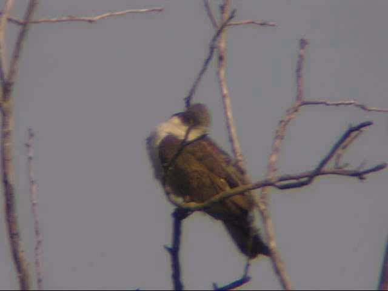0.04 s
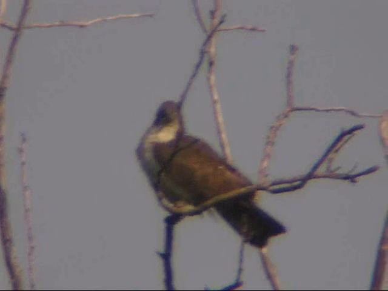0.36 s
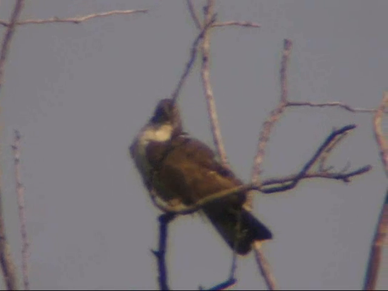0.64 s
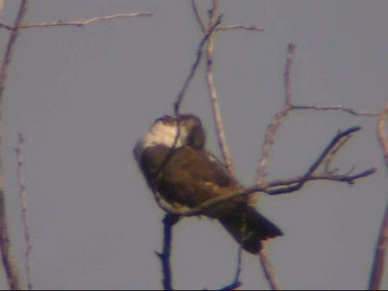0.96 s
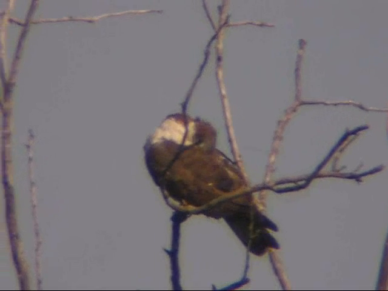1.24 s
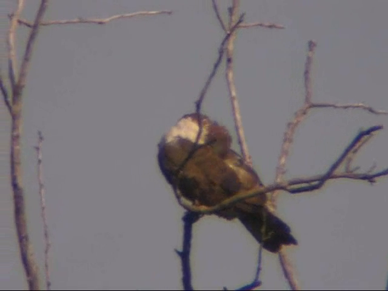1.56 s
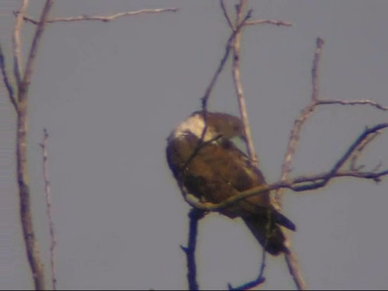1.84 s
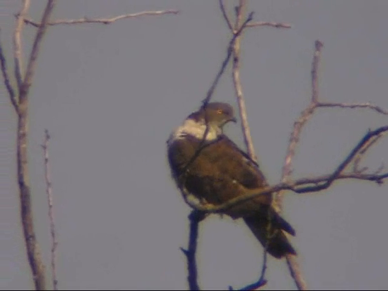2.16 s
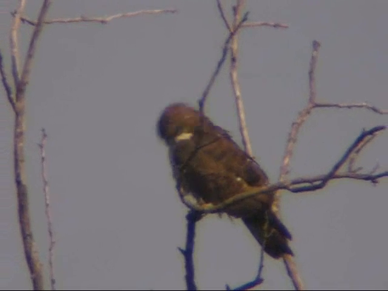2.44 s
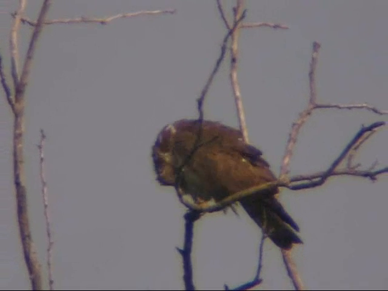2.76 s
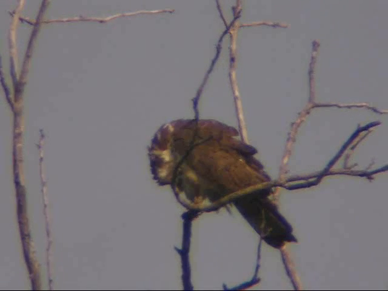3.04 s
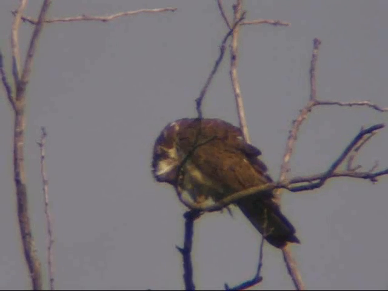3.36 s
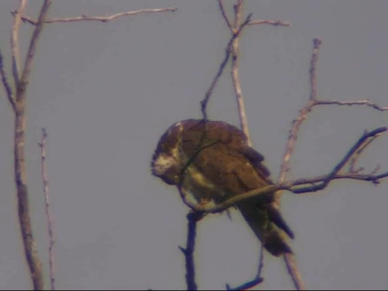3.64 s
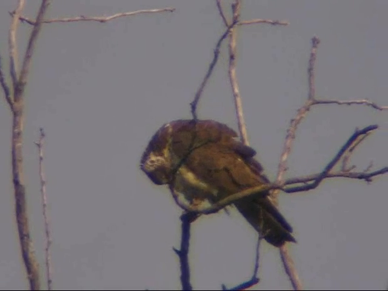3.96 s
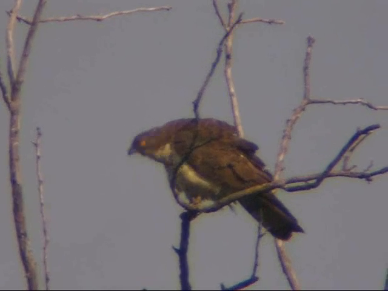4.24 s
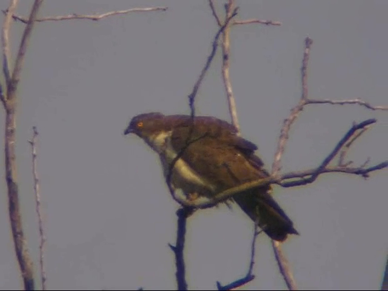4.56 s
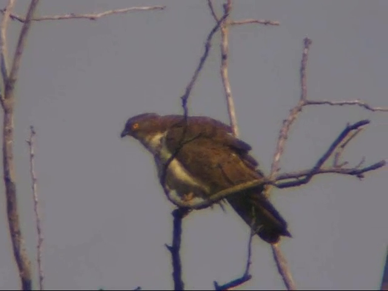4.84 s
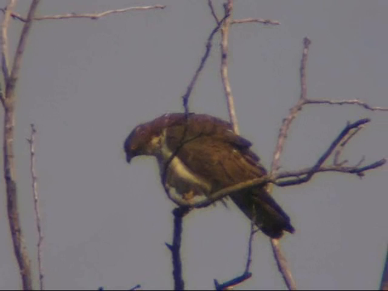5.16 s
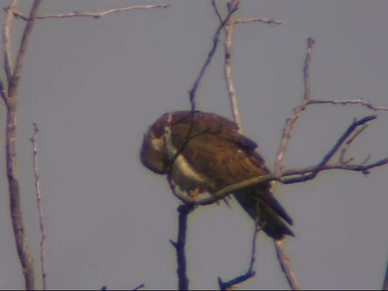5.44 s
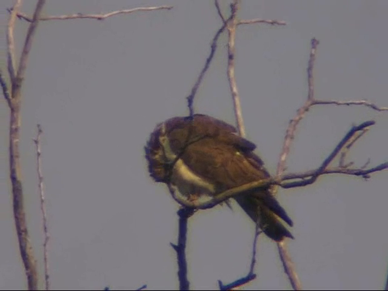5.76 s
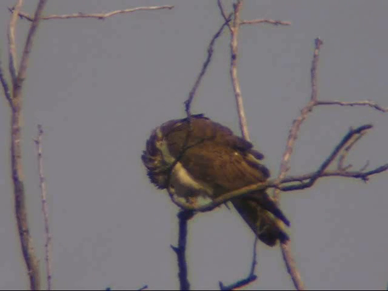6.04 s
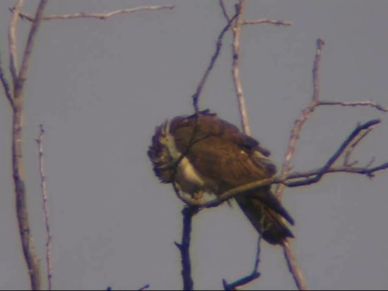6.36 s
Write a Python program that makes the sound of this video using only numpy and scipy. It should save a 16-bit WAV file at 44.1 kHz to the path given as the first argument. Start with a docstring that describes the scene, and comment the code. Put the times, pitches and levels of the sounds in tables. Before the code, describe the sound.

A small songbird warbles in quick, sweeping chirps outdoors, while wind rumbles on the microphone and one sharp click sounds close by.

```python
"""A small songbird warbles in the trees, each quick note a pure tone swept in frequency.
Other birds add ticks, buzzy trills and a thin whistle; branches and trunks scatter the song.
Turbulent gusts buffet the microphone and a few dry clicks ring close by, over a distant rush
and a late, low hum. The camera whines faintly and holds coarse samples, whose spectral
images mirror every chirp into the treble."""
import sys
import numpy as np
from scipy import signal
from scipy.fft import rfft, irfft, next_fast_len
from scipy.io import wavfile
from scipy.ndimage import uniform_filter1d, map_coordinates

SR = 44100
rng = np.random.default_rng(int(sys.argv[2]) if len(sys.argv) > 2 else 0)


def file_out(sig):
    """Save sig as 16-bit WAV at sys.argv[1]."""
    # one column per channel
    cols = np.atleast_2d(sig).T
    # limit, then scale
    lim = np.clip(cols, -1, 1)
    pcm = np.round(lim * 32767).astype(np.int16)
    wavfile.write(sys.argv[1], SR, pcm)


N = 281799
HOLD_SAMPLES = 4
NYQUIST_HZ = SR / HOLD_SAMPLES / 2  # half the camera's sampling rate
SLUR_START_HZ, WHISTLE_HZ = 4360, 4585
PUFF_EDDY_HZ = 86  # spectral corner of the large eddies in a puff
EDDY_BANK_HZ = np.geomspace(30, 960, num=11)  # corners that the long gust blends between

# Levels are relative: each source's function may add a gain of its own.
# spectrum of the distant rush: frequency_hz, density_db
RUSH_SPECTRUM = [(100, 8), (200, 6), (300, 3.5), (400, 2.5), (670, 7), (970, -1.5), (1400, -8),
                 (1900, -10.5), (3500, -11), (5200, -13)]
# slow drift of the rush: time_s, level_db
RUSH_LEVEL = [(.2, -43), (3.5, -44.5), (4.9, -42.5), (6.39, -44)]
# far hum: start_s, pitch_hz, final_level_db
FAR_HUM = (5.2, 308, -47.5)
# camera tones: pitch_hz, level_db
WHINE_TONES = [(1824, -58.5), (3606, -61), (3644, -67)]
# dry clicks: start_s, attack_level_db, cutoff_hz
DRY_CLICKS = [(0.2994, -39.5, 4500), (0.562, -38.5, 2440), (.572, -41, 4000), (1.3006, -10, 4730),
              (1.346, -36.5, 5000), (1.426, -32.5, 1330), (3.7437, -31, 1870)]
# modes that a click excites: frequency_hz, level_db, t60_s
CLICK_MODES = [(1222, -5, 0.028), (1500, -11.5, 0.034), (1890, 0, 0.012), (2093, 2.5, 0.018),
               (2430, -1, 0.021), (3170, -2, 0.016), (4230, -7, 0.0099)]
# light air on the microphone: frequency_hz, density_db
BREEZE_SPECTRUM = [(15, -9), (45, 0.5), (85, -1.5), (130, -16.5), (250, -20.5), (600, -67)]
# puffs of wind: start_s, length_s, level_db
WIND_PUFFS = [(0.139, 0.06, -22.5), (0.236, 0.028, -11), (0.284, 0.069, -20), (0.411, 0.054, -14),
              (.553, 0.05, -14.5), (0.635, .168, -16), (1.03, 0.11, -15), (3.349, 0.12, -22.5),
              (3.537, 0.043, -24), (3.806, 0.031, -23), (3.89, 0.091, -25.5), (4.198, .19, -16),
              (4.45, 0.19, -32.5)]
# wind speed of the long gust, relative to a puff: time_s, speed_ratio
GUST_SPEED = [(1.22, 0.22), (1.32, 0.87), (1.6, .92), (1.7, 1.16), (1.9, 1.42), (2.06, 2.34), (2.11, 0.29),
              (2.18, 3.48), (2.42, 2.76), (2.5, 1.93), (2.66, 4.13), (2.73, 7.65), (2.89, 7.8), (2.93, 3.8),
              (3.03, 4.8), (3.19, 3.13), (3.245, .9), (3.33, 0.4)]
# thin whistle: start_s, length_s, level_db, fade_db_per_s
THIN_WHISTLE = (1.44, .5, -45, 9)
# row of bird ticks: start_s, spacing_s, count, first_level_db, last_level_db
TICK_ROW = (.262, .1245, 9, -48, -38.5)
# falling pitch of a tick: start_hz, middle_hz, end_hz
TICK_GLIDE = (6150, 5900, 5050)
# trills: start_s, rate_per_s, count, first_top_hz, last_top_hz, fall_hz, level_db, peak_fraction
BIRD_TRILLS = [(1.511, 60.5, 9, 3550, 3150, 700, -34.5, .4), (2.273, 53, 2, 3150, 3050, 380, -33, .5),
               (2.628, 32, 6, 3020, 2830, 70, -31, .2), (3.757, 115, 3, 3200, 3150, 450, -31, .5),
               (6.298, 61, 4, 3550, 3150, 700, -28, .8)]
# down-slurs, the song's refrain: start_s, length_s, landing_hz, level_db
SONG_SLURS = [(2.416, 0.0256, 3790, -34), (2.808, 0.061, 2967, -30.5), (2.995, 0.11, 2810, -36),
              (3.324, 0.12, 3215, -31.5), (3.521, 0.11, 3140, -29), (3.715, 0.1, 3140, -26),
              (3.926, .106, 3053, -26), (4.13, .12, 3100, -27), (4.922, 0.045, 3450, -37.5)]
# notes that slide onto a pitch and hold it: start_s, length_s, start_hz, held_hz, level_db
SONG_HELD_NOTES = [(0.133, 0.047, 2670, 2740, -48), (1.375, 0.05, 4670, 4310, -47),
                   (1.851, 0.034, 2570, 2824, -34), (2.174, 0.046, 2740, 3166, -32),
                   (2.599, 0.074, 3080, 2885, -37), (2.716, 0.027, 4100, 3800, -36.5),
                   (3.169, 0.093, 3160, 3105, -26.5), (3.383, 0.063, 3900, 3924, -37),
                   (3.906, 0.062, 2755, 2870, -28.5), (4.257, 0.053, 3180, 3148, -28),
                   (4.523, 0.07, 2490, 2610, -34), (4.729, 0.1, 2713, 3183, -27.5),
                   (4.977, 0.049, 3390, 2924, -27.5), (5.096, .033, 3970, 3640, -37.5),
                   (5.318, .096, 3340, 3013, -25)]
# nearly straight sweeps: start_s, length_s, start_hz, end_hz, level_db
SONG_SWEEPS = [(1.976, 0.036, 3610, 4070, -41.5), (2.148, 0.033, 2390, 2850, -38.5),
               (2.309, 0.042, 2900, 2410, -33.5), (2.454, .056, 3610, 3060, -30),
               (2.74, .024, 3820, 4300, -37.5), (3.241, 0.041, 3080, 2420, -31.5),
               (3.823, 0.021, 3070, 2850, -31), (4.008, 0.036, 4550, 3530, -35.5),
               (4.059, 0.046, 2300, 2070, -42.5), (4.211, 0.045, 4370, 3320, -32.5),
               (4.432, 0.063, 4370, 2850, -31.5), (4.68, 0.03, 2620, 2330, -41.5),
               (5.134, 0.056, 3890, 3600, -36), (5.443, 0.083, 2740, 2200, -42)]
# contour of each kind of note: glide_fraction, ease_exponent, peak_fraction, thinning_db_per_khz
SLUR_CONTOUR = (.8, 1.8, 0.77, 10)
HELD_CONTOUR = (0.49, 2.12, 0.46, 6.9)
SWEEP_CONTOUR = (0.93, 0.99, 0.45, 4.4)


def amp(db):
    """Amplitude ratio of a level in decibels."""
    return 10 ** (np.asarray(db) / 20)


def unit(x):
    """Normalisation to rms 1."""
    return x / np.sqrt(np.mean(x ** 2) + 1e-20)


def curve(points):
    """Linear interpolation of (time_s, value) points at every sample."""
    return np.interp(np.arange(N) / SR, *np.transpose(points))


def during(start, length, fade_s):
    """A raised-cosine gate, its flanks centred on the ends of a span."""
    t = np.arange(N) / SR - start
    return np.sin(np.pi / 2 * np.clip(.5 + np.minimum(t, length - t) / fade_s, 0, 1)) ** 2


def wobble(rate):
    """Random modulation: a spline through rate knots a second."""
    knots = rng.standard_normal(int(N * rate / SR) + 4)
    return map_coordinates(knots, [np.arange(N) * rate / SR])


def filtered(x, response):
    """Linear filtering: the spectrum is multiplied by a frequency response."""
    size = next_fast_len(N + SR // 2)
    return irfft(rfft(x, size) * response(np.fft.rfftfreq(size, 1 / SR)), size)[:N]


def noise(spectrum):
    """Coloured noise of rms 1, band-limited to the camera's Nyquist frequency."""
    points_hz, db = np.transpose(spectrum)
    colour = lambda hz: amp(np.interp(np.log(hz + 1), np.log(points_hz), db)) * (hz < NYQUIST_HZ)
    return unit(filtered(rng.standard_normal(N), colour))


def add(track, start_s, sound):
    """Superposition of a sound onto a track."""
    part = track[round(start_s * SR):][:len(sound)]
    part += sound[:len(part)]


def tone(hz):
    """A sinusoid whose phase is the integral of its frequency."""
    return np.sin(2 * np.pi * np.cumsum(hz) / SR)


def distant_rush(gain_db=4):
    """Broadband noise, strongest in the bass, under slow amplitude modulation."""
    return amp(curve(RUSH_LEVEL) + gain_db + 0.44 * wobble(4)) * noise(RUSH_SPECTRUM)


def far_hum(waver_hz=14):
    """A low tone with random frequency modulation grows linearly out of the rush."""
    start, hz, db = FAR_HUM
    swell = curve([(start, 0), (N / SR, 1)])
    return amp(db) * swell * unit(tone(hz + waver_hz * wobble(60)))


def camera_whine():
    """Faint sinusoids, each with slight frequency modulation."""
    return sum(amp(db) * unit(tone(hz + 2 * wobble(8))) for hz, db in WHINE_TONES)


def clicks(crack_t60=0.013, low_cut_hz=700):
    """Impulse response: a short crack of noise and the free decay of damped modes."""
    out, t = np.zeros(N), np.arange(SR // 10) / SR
    highpass = signal.butter(2, low_cut_hz, "high", fs=SR, output="sos")
    for start, db, cutoff_hz in DRY_CLICKS:
        ring = np.zeros(len(t))
        for hz, mode_db, t60 in CLICK_MODES:
            decay = amp(mode_db + rng.normal(0, 1) - 60 * t / t60)
            ring += decay * np.sin(2 * np.pi * (hz * t + rng.random()))
        crack = amp(-60 * t / crack_t60) * rng.standard_normal(len(t))
        lowpass = signal.butter(6, min(cutoff_hz, NYQUIST_HZ), fs=SR, output="sos")
        snap = signal.sosfilt(highpass, signal.sosfilt(lowpass, ring + crack))
        add(out, start, amp(db) * snap / np.std(snap[t < .003]))  # level of the first 3 ms
    return out


def eddies(white, corner_hz, steepness=7, tilt=0.28, fine_db=-24, fine_ratio=2.8):
    """Turbulent cascade: large eddies below a corner break up into weaker, smaller ones."""
    def band(hz, corner):
        return (hz > 15) * (hz + 1) ** -tilt / np.sqrt(1 + (hz / corner) ** steepness)
    cascade = lambda hz: band(hz, corner_hz) + amp(fine_db) * band(hz, fine_ratio * corner_hz)
    flow = unit(filtered(white, cascade))
    local_power = np.abs(uniform_filter1d(flow ** 2, size=2200))
    return flow / np.sqrt(local_power + 0.098)  # evens out the strength


def puffs(gain_db=1.0, fade_s=0.07):
    """Intermittent turbulence: short bursts of large, slow eddies."""
    strength = sum(amp(db + gain_db) * during(start, length, fade_s) for start, length, db in WIND_PUFFS)
    return strength * eddies(rng.standard_normal(N), PUFF_EDDY_HZ)


def long_gust(full_db=-12.5, knee_speed=1.12, growth=4, unsteadiness=0.15):
    """Eddy frequency scales with wind speed; amplitude follows a power law, then levels off."""
    speed = curve(GUST_SPEED)
    corner_hz = PUFF_EDDY_HZ * speed * np.exp(unsteadiness * wobble(70))
    bank_index = np.interp(np.log(corner_hz), np.log(EDDY_BANK_HZ), np.arange(len(EDDY_BANK_HZ)))
    white = rng.standard_normal(N)
    flow = np.zeros(N)
    for k, hz in enumerate(EDDY_BANK_HZ):
        weight = np.maximum(1 - np.abs(bank_index - k), 0)
        flow += weight * eddies(white, hz)
    return amp(full_db) * flow / np.sqrt(1 + (knee_speed / speed) ** (2 * growth))


def wind(breeze_db=-36, flutter_db=3.5, overload=0.5, muffle_hz=2200):
    """Saturation: gusts ride on a light breeze, and the strongest eddies overload the microphone."""
    gusts = (puffs() + long_gust()) * amp(flutter_db * wobble(80))
    pressure = gusts + amp(breeze_db) * noise(BREEZE_SPECTRUM)
    saturated = pressure / (1 + np.abs(pressure / overload) ** 6) ** (1 / 6)
    return filtered(saturated, lambda hz: 1 / np.sqrt(1 + (hz / muffle_hz) ** 10))


def trees(x, near_db=-14, near_t60=0.28, far_db=-14, far_t60=0.65, echo_s=0.12, echo_db=-20):
    """Scattering from near branches and far trunks, with one reflection from a line of trees."""
    t = np.arange(SR) / SR
    near = rng.standard_normal(SR) * amp(-60 * t / near_t60)
    far = rng.standard_normal(SR) * amp(-60 * t / far_t60) * (1 - np.exp(-t / 0.006))
    echoes = amp(near_db) * near / np.linalg.norm(near) + amp(far_db) * far / np.linalg.norm(far)
    echoes[round(echo_s * SR)] += amp(echo_db)
    return x + signal.fftconvolve(x, echoes)[:N]


def chirp(length, pitches, peak_at, waver, edge_s=0.0026):
    """A frequency glide through evenly spaced pitch points under a Gaussian envelope."""
    progress = np.linspace(0, 1, max(round(length * SR), 2))
    glide = np.interp(progress, np.linspace(0, 1, len(pitches)), pitches)
    jitter = map_coordinates(rng.standard_normal(64), [progress * length * 250], mode="mirror")
    from_edge_s = np.minimum(progress, 1 - progress) * length
    gate = np.sin(np.pi / 2 * np.clip(from_edge_s / edge_s, 0, 1)) ** 2
    swell = np.exp(-3.2 * (progress - peak_at) ** 2)
    return gate * swell * tone(glide * (1 + waver * jitter))


def bird_whistle(flutter_db=2.5, waver_hz=14):
    """A thin, nearly pure tone swells, then flutters in slow exponential decay."""
    start, length, db, fade_db_per_s = THIN_WHISTLE
    level = db - fade_db_per_s * (np.arange(N) / SR - start) + flutter_db * wobble(20.9)
    return during(start, length, fade_s=0.15) * amp(level) * tone(WHISTLE_HZ + waver_hz * wobble(50))


def bird_ticks(gain_db=-2, length_s=0.021):
    """A periodic train of high, falling chirps, rising in level as it draws nearer."""
    out = np.zeros(N)
    start, spacing, count, first_db, last_db = TICK_ROW
    for k, db in enumerate(np.linspace(first_db, last_db, count)):
        tick = chirp(length_s, TICK_GLIDE, peak_at=0.65, waver=0.02)
        add(out, start + k * spacing, amp(db + gain_db) * tick)
    return out


def bird_trills(duty=0.73, taper_db=12):
    """Rapid repetition fuses down-sweeps into a buzz that sinks in pitch as it swells and fades."""
    out = np.zeros(N)
    for start, rate, count, first_hz, last_hz, fall_hz, db, peak_at in BIRD_TRILLS:
        for k, progress in enumerate(np.linspace(0, 1, count)):
            top_hz = first_hz + progress * (last_hz - first_hz)
            note = chirp(duty / rate, [top_hz, top_hz - fall_hz], peak_at=0.5, waver=0.024)
            add(out, start + k / rate, amp(db - taper_db * (progress - peak_at) ** 2) * note)
    return out


def syllable(length, from_hz, to_hz, contour, waver=0.0061):
    """A power-law glide, attenuated where it lies above the pitch at its envelope peak."""
    glide_fraction, ease, peak_at, thinning_db_per_khz = contour
    pitch = lambda u: to_hz + (from_hz - to_hz) * np.maximum(1 - u / glide_fraction, 0) ** ease
    hz = pitch(np.linspace(0, 1, round(length * SR)))
    above_khz = np.maximum(hz - pitch(peak_at), 0) / 1000
    return amp(-thinning_db_per_khz * above_khz) * chirp(length, hz, peak_at, waver)


def songbird(slur_db=1, held_db=0.5, flutter_db=2.2):
    """Frequency modulation of a pure tone forms slurs, held notes and sweeps; the level flutters."""
    out = np.zeros(N)
    for start, length, landing_hz, db in SONG_SLURS:
        add(out, start, amp(db + slur_db) * syllable(length, SLUR_START_HZ, landing_hz, SLUR_CONTOUR))
    for start, length, from_hz, to_hz, db in SONG_HELD_NOTES:
        add(out, start, amp(db + held_db) * syllable(length, from_hz, to_hz, HELD_CONTOUR))
    for start, length, from_hz, to_hz, db in SONG_SWEEPS:
        add(out, start, amp(db) * syllable(length, from_hz, to_hz, SWEEP_CONTOUR))
    return out * amp(flutter_db * wobble(90))


def scene():
    """Superposition at the microphone: birds among the trees, wind, clicks and the background."""
    birds = trees(songbird() + bird_trills() + bird_whistle() + bird_ticks())
    return (birds + wind() + clicks() + distant_rush() + camera_whine() + far_hum())[None]


def record(dry, start_s=0.128, top_hz=15560):
    """Zero-order hold: the camera starts a moment late, and its held samples mirror the sound upward."""
    held = np.repeat(dry[0, ::HOLD_SAMPLES], HOLD_SAMPLES)[:N]
    running = np.arange(N) / SR >= start_s
    return filtered(held * running, lambda hz: hz < top_hz)[None]


dry = scene()
out = record(dry)
file_out(out)
```